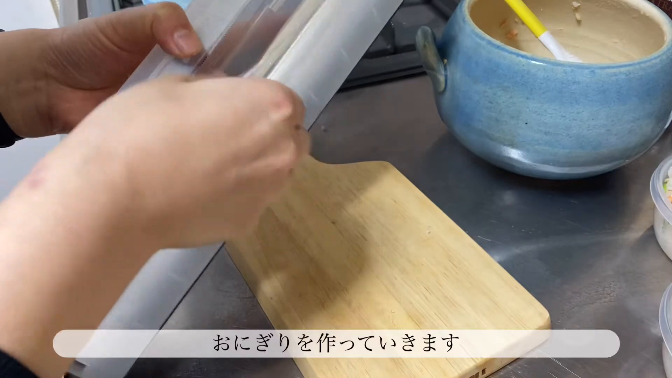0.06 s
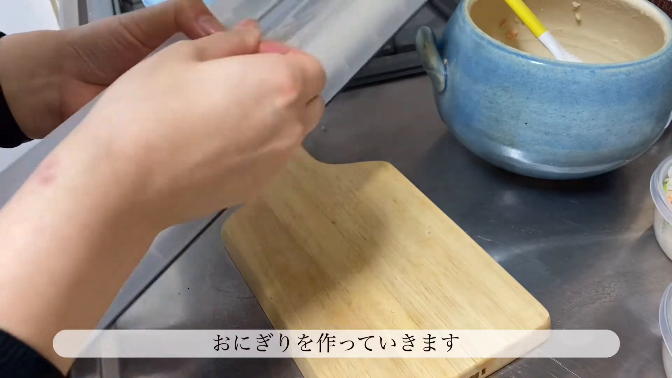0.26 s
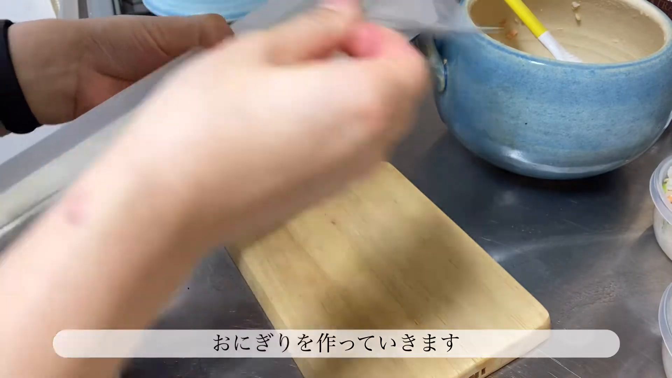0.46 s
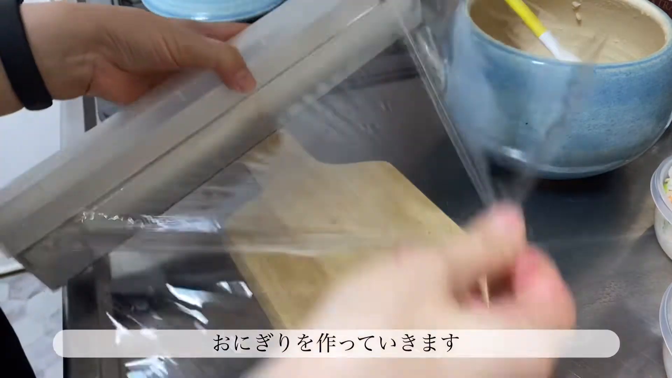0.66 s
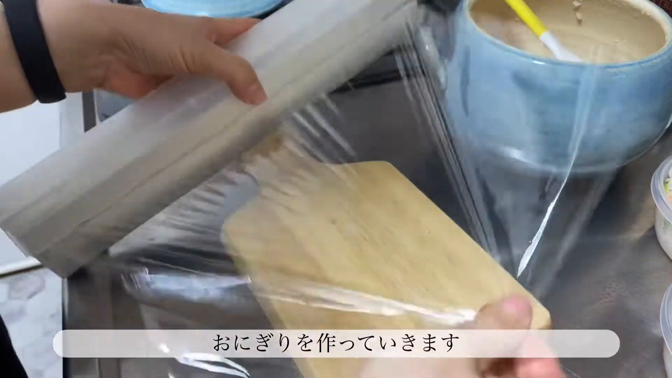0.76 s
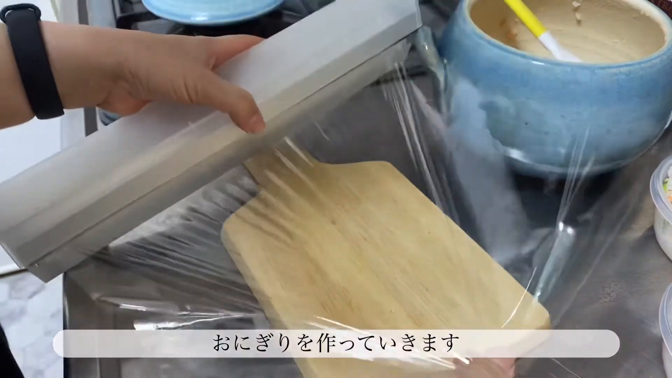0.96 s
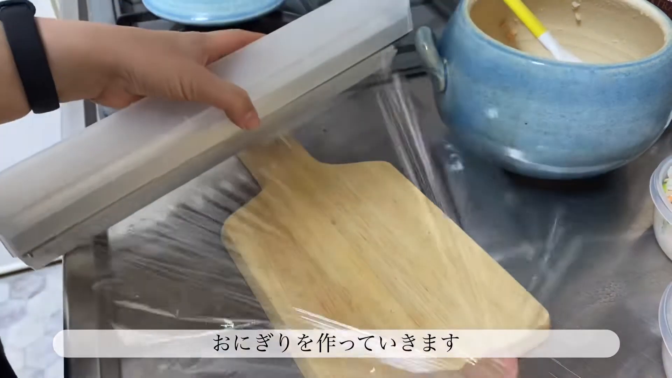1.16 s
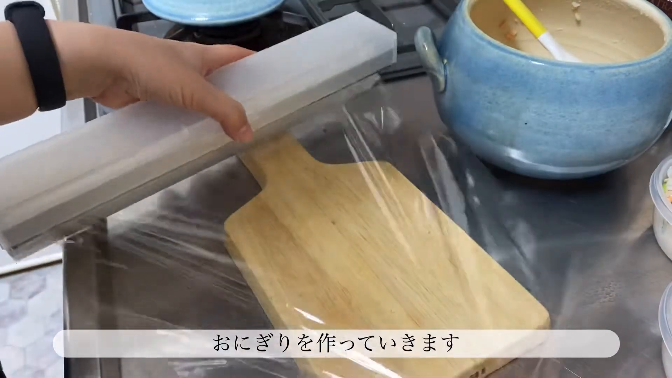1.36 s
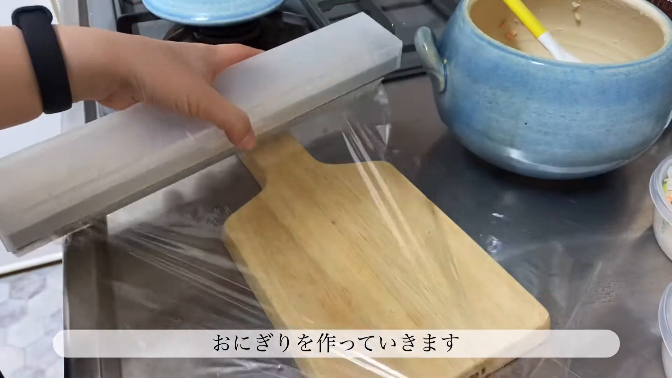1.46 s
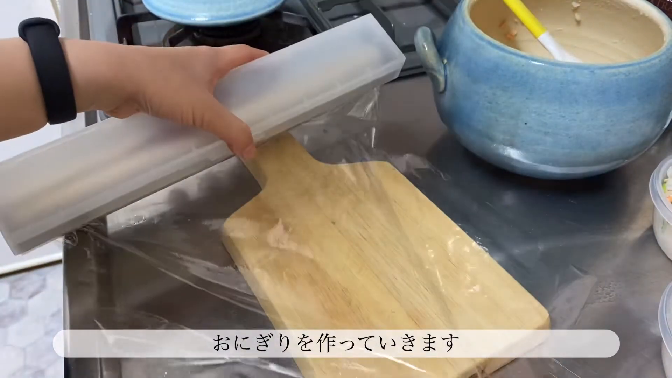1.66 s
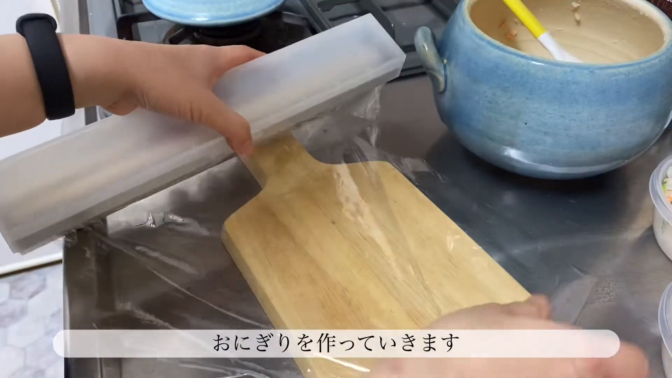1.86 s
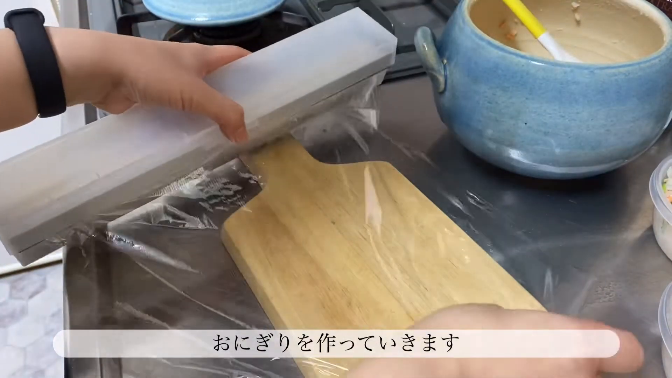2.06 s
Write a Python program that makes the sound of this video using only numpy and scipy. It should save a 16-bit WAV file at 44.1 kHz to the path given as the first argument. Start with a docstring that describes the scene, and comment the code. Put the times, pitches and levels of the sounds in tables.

```python
"""A faint crackle and low flutter of cling film over room tone come first, then hard knocks and rattles.
The film is pulled off a roll in a plastic dispenser over a kitchen counter, near a phone.
It peels in tiny noise cracks and larger snaps; the roll's blows ring the modes of its hollow case.
The taut sheet booms like a slack drum in falling tones; counter and kitchen return the sound."""
import sys
import numpy as np
from scipy import signal
from scipy.fft import rfft, irfft
from scipy.io import wavfile
from scipy.ndimage import uniform_filter1d

SR = 44100
rng = np.random.default_rng(int(sys.argv[2]) if len(sys.argv) > 2 else 0)


def pcm_store(signal):
    """Save signal as 16-bit PCM."""
    levels = np.round(np.clip(np.atleast_2d(signal), -1, 1) * 32767)
    wavfile.write(sys.argv[1], SR, levels.astype(np.int16).T)


def gain_from_decibels(decibels):
    """Convert decibel values to linear amplitude factors."""
    exponent = np.asarray(decibels, float) / 20
    return 10 ** exponent


N = 92610

# Modes of the hollow plastic case. Each row: pitch in Hz, relative level in dB, t60 in seconds.
CASE_MODES = [(399, 0.5, 0.02), (474.3, 2, 0.063), (680, -8.5, 0.04), (850, -10.5, 0.083), (928, 0, 0.043),
              (1042.5, -2, 0.04), (1284, -3, 0.032), (1572, -11, 0.023), (1633, 1, 0.023), (1829, 1, 0.017),
              (1907, 0.5, 0.015), (2090, -6, 0.02), (2416, -8, 0.033), (2677, -0.5, 0.013)]
CASE_LOW_HZ = 337  # the struck case sound is cut off below this
MODE_SPREAD_DB = 1.5  # random level spread of the modes


def evened(x):
    """Scales to rms 1."""
    return x / np.sqrt(np.mean(x ** 2) + 1e-20)


def read(points, hz):
    """Reads a spectrum on a log frequency axis."""
    f, value = np.transpose(points)
    return np.interp(np.log(hz + 1), np.log(f + 1), value)


def follow(curve):
    """Gain per sample from a curve of seconds and dB."""
    t, db = np.transpose(curve)
    return gain_from_decibels(np.interp(np.arange(N) / SR, t, db))


def colour(x, spectrum):
    """Shapes x by a spectrum of Hz and dB."""
    gain = gain_from_decibels(read(spectrum, np.fft.rfftfreq(N, 1 / SR)))
    return irfft(rfft(x) * gain, N)


def add(mix, s, sound):
    """Mixes a sound in at s seconds."""
    part = mix[round(s * SR):][:len(sound)]
    part += sound[:len(part)]


def clicks(per_s, size_db):
    """Sparse clicks of random sign, a few of them large."""
    chance, sign, size = rng.random((N, 3)).T
    sizes = gain_from_decibels(size_db * np.minimum(-np.log(size + 1e-9), 4))
    return (chance < per_s / SR) * np.sign(sign - .5) * sizes


def diffuse(pair):
    """Blends two unrelated sounds into a left and right as alike as the field is at each pitch."""
    # Likeness of diffuse sound at the two ports. Each row: frequency in Hz, likeness from 0 to 1.
    alike = [(60, 0.97), (300, 0.5), (800, 0), (4000, 0), (16000, 0.4)]
    same = np.clip(read(alike, np.fft.rfftfreq(N, 1 / SR)), 0, 1)
    a, b = rfft(pair)
    shared, apart = np.sqrt(1 + same) * a, np.sqrt(1 - same) * b
    return irfft(np.array([shared + apart, shared - apart]) / np.sqrt(2), N)


def room_tone():
    """The quiet kitchen: steady shaped noise, diffuse at the microphone."""
    # Shape of the room tone. Each row: frequency in Hz, relative level in dB.
    room_shape = [(25, 8), (59, 13.5), (141, 7), (300, -5), (405, 9), (6920, -60), (11900, -49),
                  (16000, -33.5)]
    tone = diffuse(np.array([colour(z, room_shape) for z in rng.standard_normal((2, N))]))
    return gain_from_decibels(-66.5) * evened(tone)


def peel():
    """Film letting go of the roll: thousands of tiny noise bursts a second, in clumps."""
    # Crackle of the peeling film. Each row: time in seconds, relative level in dB.
    peel_curve = [(0, -52.5), (.1, -59.5), (.2, -66), (.3, -56), (.39, -44), (.44, -44.5), (.53, -40.5),
                  (.6, -37), (.65, -47.5), (.68, -46.5), (.74, -46.5), (.81, -61), (.85, -65), (.93, -76.5),
                  (1.02, -53.5), (1.07, -68.5), (1.12, -47.5), (1.205, -43.5), (1.25, -36), (1.32, -48.5),
                  (1.36, -59.5), (1.42, -73.5), (1.5, -61.5), (1.55, -49), (1.6, -70), (1.72, -76.5),
                  (1.88, -67.5), (1.92, -65), (2.0, -74.5), (2.1, -66)]
    cracks_per_s, size_db, t60, clump_db, kinds = 2500, 3.5, 0.0017, 1.5, 30
    t = np.arange(600) / SR
    cracks = np.zeros(N)
    for kind in range(kinds):
        crack = rng.standard_normal(len(t)) * gain_from_decibels(-60 * t / t60)
        cracks += signal.oaconvolve(clicks(cracks_per_s / kinds, size_db), crack)[:N]
    clumps = gain_from_decibels(clump_db * evened(uniform_filter1d(rng.standard_normal(N), 350)))
    return gain_from_decibels(5.5) * follow(peel_curve) * evened(cracks * clumps)


def snaps():
    """Larger single snaps of the film: noise bursts with a quick rise and a decay."""
    # Snaps. Each row: start in seconds, relative level in dB, t60 in seconds.
    snap_rows = [(0.0488, -28, 0.016), (0.1483, -39, 0.036), (0.1585, -32.5, 0.019), (0.5541, -19, 0.024),
                 (0.615, -28, 0.042), (0.6596, -26.5, 0.12), (0.6788, -17, 0.022), (0.7153, -25, 0.032),
                 (0.7278, -21, 0.0104), (0.7951, -28.5, 0.04), (0.9368, -34.5, 0.021),
                 (0.9726, -31, 0.0064), (1.0244, -27.5, 0.011), (1.043, -26, 0.007), (1.073, -37, 0.031),
                 (1.1014, -24.5, 0.01), (1.1335, -26, 0.023), (1.1603, -19, 0.021), (1.2548, -20.5, 0.018),
                 (1.3214, -26.5, 0.041), (1.4247, -40.5, 0.016), (1.5264, -36, 0.03),
                 (1.5474, -30.5, 0.034), (1.6821, -47, 0.01), (1.745, -44.5, 0.046), (1.7597, -34.5, 0.01),
                 (1.8933, -38.5, 0.024), (1.9112, -50, 0.013), (2.0653, -44.5, 0.021)]
    rise_s, trim_db = .0004, -4.5
    out, t = np.zeros(N), np.arange(2600) / SR
    for s, db, t60 in snap_rows:
        decay = gain_from_decibels(db + trim_db - 60 * t / t60)
        add(out, s, decay * np.minimum(t / rise_s, 1) * rng.standard_normal(len(t)))
    return out


def film():
    """Peel and snaps in the colour of thin film, with a treble that varies over time."""
    # Colour of the film. Each row: frequency in Hz, relative level in dB.
    film_colour = [(240, -25.5), (450, -22.5), (900, -3.5), (1800, -13), (4000, -12.5), (6500, -13.5),
                   (9000, -5.5), (12000, -8.5), (15500, -10.5)]
    # Gain of the film's treble. Each row: time in seconds, gain in dB.
    treble_curve = [(.3, -5.5), (.65, -10), (.9, -0.5), (1.6, -4.5), (2.1, -2)]
    treble_hz = 8010  # in full from here up, fading out over the octave below
    out = peel() + snaps()
    treble = colour(out, [(treble_hz / 2, -40), (treble_hz, 0)])
    return colour(out + (follow(treble_curve) - 1) * treble, film_colour) * 4


def flutter():
    """Lumpy low flutter of the loose sheet: shaped noise that swells and sinks."""
    # Flutter. Each row: time in seconds, relative level in dB.
    flutter_curve = [(0, -52), (.07, -69), (.13, -43.5), (.3, -50), (.46, -46), (.61, -39.5), (.75, -40.5),
                     (.88, -55.5), (.98, -49.5), (1.31, -53.5), (1.35, -41.5), (1.46, -51.5), (1.75, -63.5),
                     (2.1, -67)]
    # Colour of the flapping sheet. Each row: frequency in Hz, relative level in dB.
    flap_colour = [(25, -29), (70, 5), (102, -1), (135, 1.5), (257, -2.5), (350, -13), (460, -80)]
    return gain_from_decibels(-2.5) * follow(flutter_curve) * evened(colour(rng.standard_normal(N), flap_colour))


def booms():
    """The sheet pulled taut booms in two drum modes that slide down and then waver in pitch."""
    # Booms. Each row: start in seconds, lower mode's level in dB, pitch settled on in Hz, t60 in seconds.
    boom_rows = [(0.13, -46.5, 91, 0.11), (0.443, -31, 67.5, 0.11), (.6, -30, 74.3, 0.075),
                 (0.685, -27, 152.2, 0.26), (.79, -39, 211, 0.14), (0.938, -43.5, 188, 0.35),
                 (1.151, -35.5, 169.4, 0.09), (1.331, -28.5, 108.4, 0.25), (1.791, -47, 168, 0.25)]
    extra_hz, slide_s = 500, 0.00406  # pitch added at the start, and how fast it dies away
    upper_ratio, upper_db = 1.7, -5  # second drum mode
    out, t = np.zeros(N), np.arange(SR // 3) / SR
    for s, db, end_hz, t60 in boom_rows:
        waver = 0.14 * evened(uniform_filter1d(rng.standard_normal(len(t)), 500))
        hz = end_hz * (1 + waver) + extra_hz * np.exp(-t / slide_s)
        turn = 2 * np.pi * np.cumsum(hz) / SR
        modes = np.sin(turn) + gain_from_decibels(upper_db) * np.sin(upper_ratio * turn)
        add(out, s, gain_from_decibels(db - 60 * t / t60) * modes)
    return out


def ring(gains_db, detune):
    """The case's modes struck with the given extra gains; each pitch is detuned a little at random."""
    detune_share, rise_s = .012, 0.00026  # random detuning as a share, build-up time
    hz, db, t60 = np.transpose(CASE_MODES)[:, :, None]
    t = np.arange(SR // 5) / SR
    decay = gain_from_decibels(db + gains_db[:, None] - 60 * t / t60)
    modes = decay * np.sin(2 * np.pi * hz * (1 + detune_share * detune[:, None]) * t)
    struck = modes.sum(0) * (1 - np.exp(-t / rise_s))
    return signal.sosfilt(signal.butter(4, CASE_LOW_HZ, "high", fs=SR, output="sos"), struck)


def rattle():
    """Small bumps of the turning roll, ringing the case from four different spots."""
    # Rattle. Each row: time in seconds, relative level in dB.
    rattle_curve = [(0, -65), (.1, -85), (.13, -60), (.18, -70), (.25, -55), (.3, -55.5), (.43, -28.5),
                    (.5, -42), (.63, -57), (.72, -29), (.92, -57.5), (.96, -36), (1.07, -58), (1.15, -44.5),
                    (1.32, -37), (1.42, -55.5), (1.55, -46.5), (1.65, -80), (1.87, -48), (2.1, -95)]
    bumps_per_s, size_db, spots = 340, 5.5, 4
    out = np.zeros(N)
    for spot in range(spots):
        gains, detune = rng.standard_normal((2, len(CASE_MODES)))
        bumps = clicks(bumps_per_s / spots, size_db)
        out += signal.oaconvolve(bumps, ring(MODE_SPREAD_DB * gains, detune))[:N]
    return gain_from_decibels(-9.5) * follow(rattle_curve) * evened(out)


def knocks():
    """Roll against case: a blow plus a rough contact, favouring the modes around its own centre."""
    # Knocks. Each row: start in seconds, relative strength in dB, centre in Hz,
    # breadth in octaves (at least 0.15 is used), contact in seconds.
    knock_rows = [(.109, -31, 680, 2.4, 0.0015), (.126, -30, 775, 2.2, 0.0011),
                  (.186, -28.5, 790, 0.94, 0.0023), (0.207, -26.5, 490, 0.81, 0.008),
                  (.231, -24, 500, 1.9, 0.0035), (.268, -39.5, 1830, 0.2, .001),
                  (0.381, -30, 880, 0.11, 0.0027), (0.44, -10, 725, 4.2, 0.0024),
                  (.526, -18.5, 650, 3.6, 0.0022), (0.554, -12.5, 1350, 2.8, 0.0017),
                  (.592, -13.5, 540, 1.2, 0.00096), (.616, -13.5, 1490, 2.1, 0.0013),
                  (.661, -18, 900, 7, 0.0035), (0.677, -17.5, 1230, 3.3, 0.0019),
                  (0.691, -17.5, 493, 0.74, 0.0064), (0.723, -27, 704, 3.3, 0.0026),
                  (0.783, -31, 880, 0.6, 0.00088), (1.025, -41.5, 1900, 0.17, 0.0011),
                  (1.116, -34.5, 2090, 0.072, 0.01), (1.134, -27.5, 806, 0.062, 0.022),
                  (1.214, -28, 790, 0.7, 0.00051), (1.258, -38.5, 2090, 0.093, 0.06),
                  (1.288, -31.5, 860, 0.52, 0.007), (1.53, -25, 690, 1.2, 0.0028),
                  (1.789, -29, 1700, 2.46, 0.00041)]
    trim_db = -14.5
    rough_s = 0.0024  # contacts longer than this are more scrape than blow
    blow_cycles = 0.25  # the blow lasts this share of a cycle of the centre pitch
    mode_hz = np.transpose(CASE_MODES)[0]
    out, t = np.zeros(N), np.arange(3000) / SR
    for s, db, centre_hz, breadth, contact in knock_rows:
        u = t / contact
        scrape = np.sqrt(u) * np.exp(-u)
        scrape = scrape * rng.standard_normal(len(t)) / np.linalg.norm(scrape)
        blow = np.sin(np.pi * np.minimum(t * centre_hz / blow_cycles, 1)) ** 2
        push = blow / blow.sum() + contact / rough_s * scrape
        away = np.log2(mode_hz / centre_hz) / max(breadth, .15)
        spread, detune = rng.standard_normal((2, len(CASE_MODES)))
        hit = signal.fftconvolve(push, ring(-10 * away ** 2 + MODE_SPREAD_DB * spread, detune))
        # level is set by the first 900 samples of the hit
        add(out, s, gain_from_decibels(db + trim_db) * hit / np.sqrt(np.mean(hit[:900] ** 2)))
    return out


def thuds():
    """Dead taps of the roll against hand or lid: a few cycles that swell, sag in pitch and stop."""
    # Taps. Each row: start in seconds, level in dB before the swell, starting pitch in Hz, t60 in seconds.
    thud_rows = [(.4395, -8, 1755, 0.01), (.553, -14.5, 2000, 0.017), (.592, -3.5, 890, 0.0075),
                 (.616, -12, 2236, 0.012), (.9955, -20.5, 780, .012), (1.0, -12, 667, 0.006),
                 (1.104, -37, 312, 0.038), (1.328, -14.5, 907, 0.015), (1.7885, -14, 850, 0.013)]
    sag, rise_s = 0.049, 0.00042  # share of pitch lost, swell time
    out, t = np.zeros(N), np.arange(3000) / SR
    for s, db, hz, t60 in thud_rows:
        pitch = hz * (1 - sag * (1 - np.exp(-t / t60 * 4)))
        swell = (1 - np.exp(-t / rise_s)) ** 2
        add(out, s, gain_from_decibels(db - 60 * t / t60) * swell * np.sin(2 * np.pi * np.cumsum(pitch) / SR))
    return out


def counter(x):
    """Close bounces off counter and board, different at each side."""
    bounces, longest_s, top_hz = 14, .004, 8000
    taps = np.zeros((2, 1500))
    at = (12 + longest_s * SR * rng.random((2, bounces)) ** 2).astype(int)
    np.put_along_axis(taps, at, rng.choice([-1., 1.], at.shape) / np.sqrt(bounces), 1)
    band = signal.butter(2, [2 * CASE_LOW_HZ, top_hz], "band", fs=SR, output="sos")
    taps = signal.sosfilt(band, taps)
    return x + gain_from_decibels(-3.5) * signal.fftconvolve(x[None], taps, axes=1)[:, :N]


def kitchen(x):
    """Sparse reflections, each band dying at its own speed; the sound fades in a steady cycle
    among three such tails, for an even reverberation."""
    # Decay of the kitchen. Each row: frequency in Hz, t60 in seconds.
    decay_times = [(200, 0.077), (800, 0.21), (3000, 0.12), (12000, 0.054)]
    cycles_per_s = 25
    taps = np.zeros((3, 2, SR // 2))
    at = np.arange(100, SR // 2 - 20, 20)
    at = at + rng.integers(0, 20, (3, 2, len(at)))
    np.put_along_axis(taps, at, rng.choice([-1., 1.], at.shape), 2)
    hz, t, z = signal.stft(taps, SR, nperseg=128)
    tail = signal.istft(z * gain_from_decibels(-60 * t / read(decay_times, hz)[:, None]), SR, nperseg=128)[1]
    tail = tail / np.linalg.norm(tail[0, 0])
    cycle = cycles_per_s * np.arange(N) / SR + np.arange(3)[:, None] / 3
    share = np.sqrt(2 / 3) * np.cos(2 * np.pi * cycle)
    wet = signal.fftconvolve((share * x)[:, None], tail, axes=2).sum(0)
    return diffuse(wet[:, :N])


def ports(x):
    """The two microphone ports add their own delay and balance."""
    # Phase between the ports. Each row: frequency in Hz, lead of the left in radians.
    lead = [(0, 0), (860, 1), (2070, .3), (3190, 1.3), (4910, .4), (6980, -.3), (8200, -2.5), (8900, -3.7),
            (10400, -6.3), (11600, -6.5), (12700, -9.1), (14000, -9.7), (15200, -12.5)]
    # Balance of the ports. Each row: frequency in Hz, left minus right in dB.
    balance = [(60, -0.5), (150, -7), (380, 0.5), (950, 0), (2380, 1), (5980, 1), (15000, -0.5)]
    hz = np.fft.rfftfreq(N, 1 / SR)
    half = gain_from_decibels(read(balance, hz) / 2) * np.exp(.5j * np.interp(hz, *np.transpose(lead)))
    return irfft(rfft(x) * np.array([half, 1 / half]), N)


def scene():
    """Dispenser and film close by, their reflections, and the room tone."""
    wrap = film() + flutter() + booms()
    case = rattle() + knocks() + thuds()
    close = counter(case) + counter(wrap)
    return close + gain_from_decibels(-5.5) * kitchen(case + wrap) + room_tone()


def band_limit(x):
    """A steep low-pass at the top of the band."""
    return signal.sosfilt(signal.butter(12, 16980, fs=SR, output="sos"), x)


def record(dry):
    """The phone hears the scene through its two ports, within its band limits."""
    low_hz, edge_hz = 45, 15900
    heard = signal.sosfilt(signal.butter(4, low_hz, "high", fs=SR, output="sos"), ports(dry))
    heard = signal.sosfilt(signal.cheby1(10, .5, edge_hz, fs=SR, output="sos"), heard)
    return band_limit(heard)


dry = scene()
out = record(dry)
pcm_store(out)
```